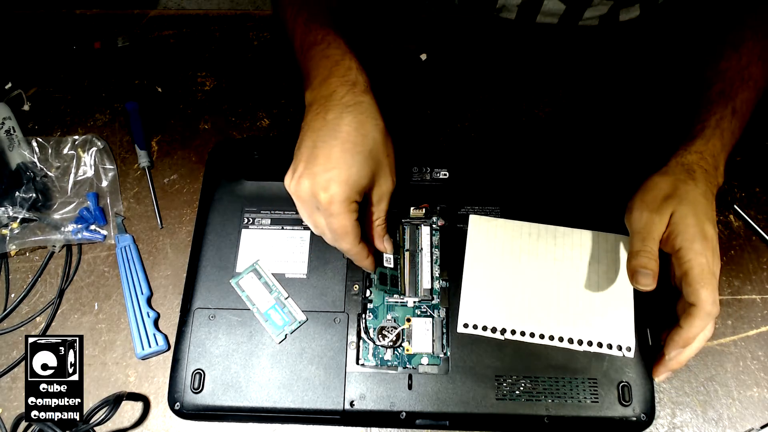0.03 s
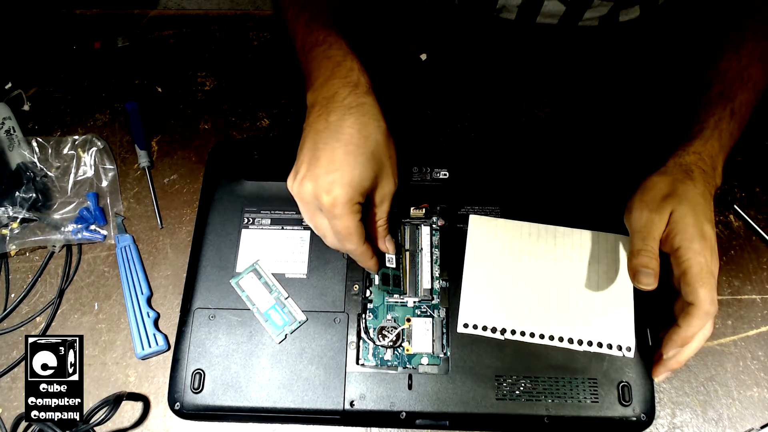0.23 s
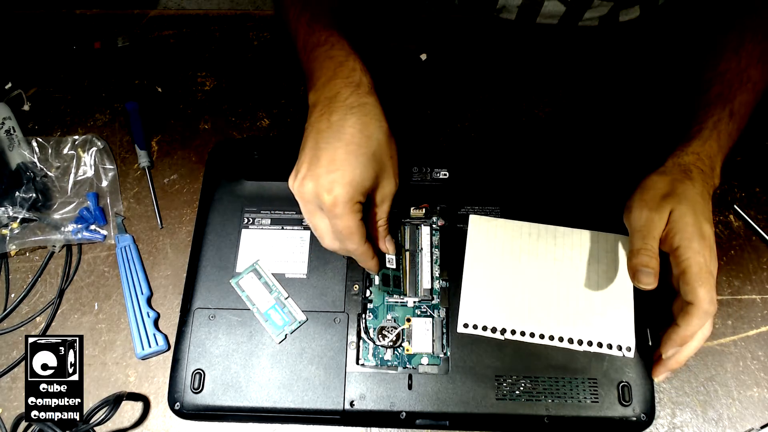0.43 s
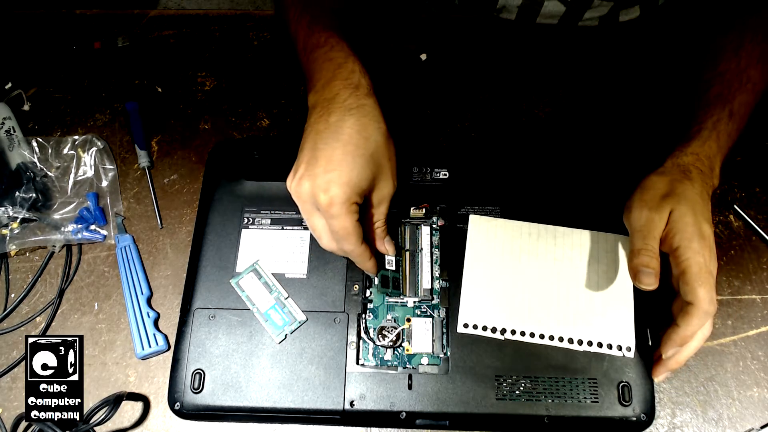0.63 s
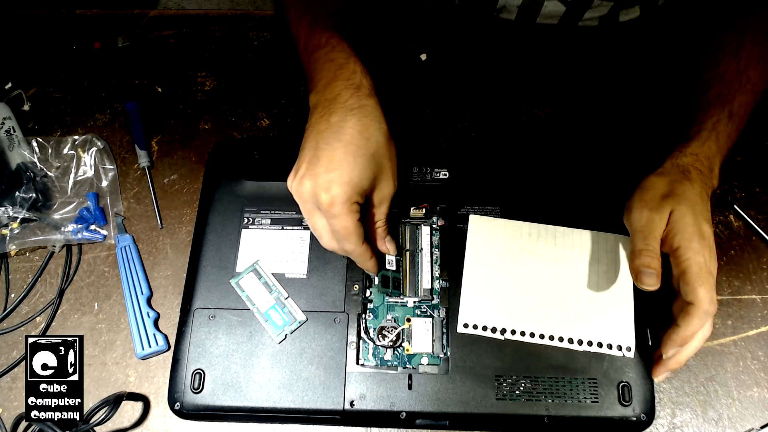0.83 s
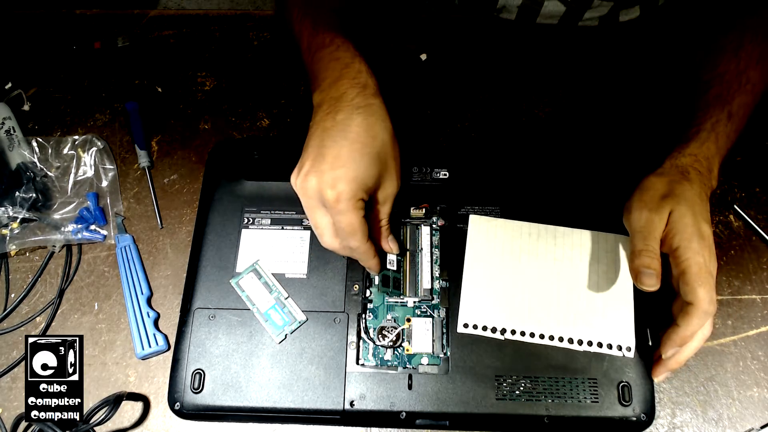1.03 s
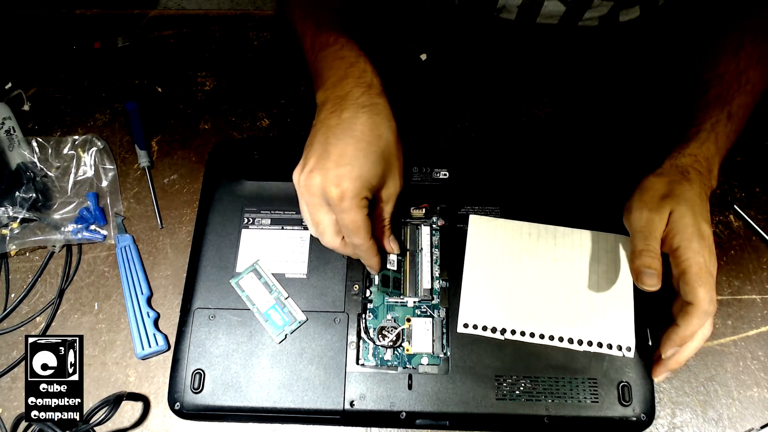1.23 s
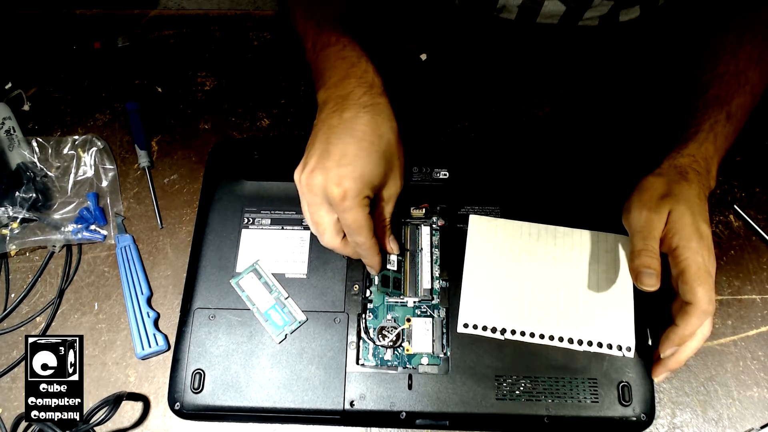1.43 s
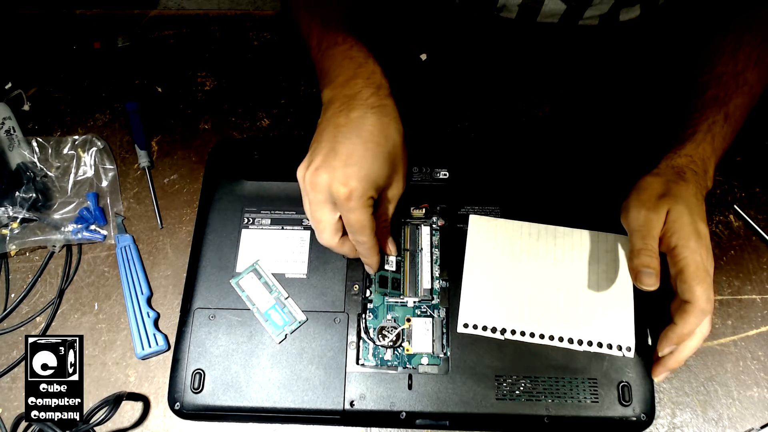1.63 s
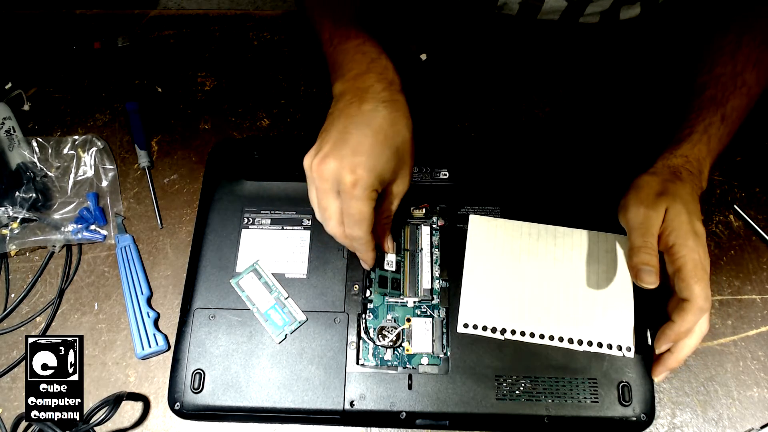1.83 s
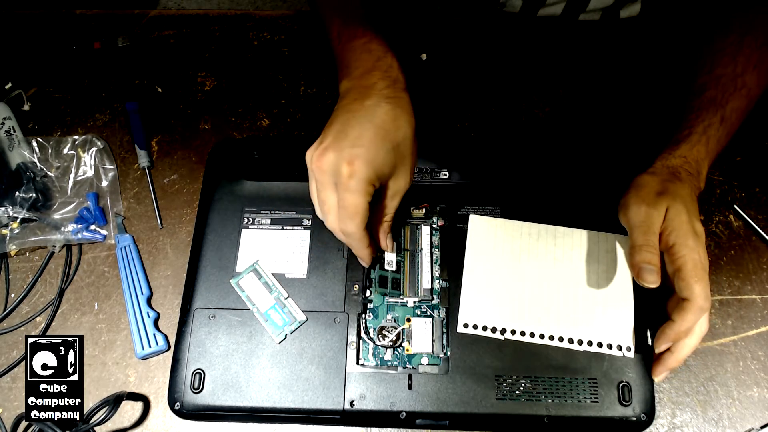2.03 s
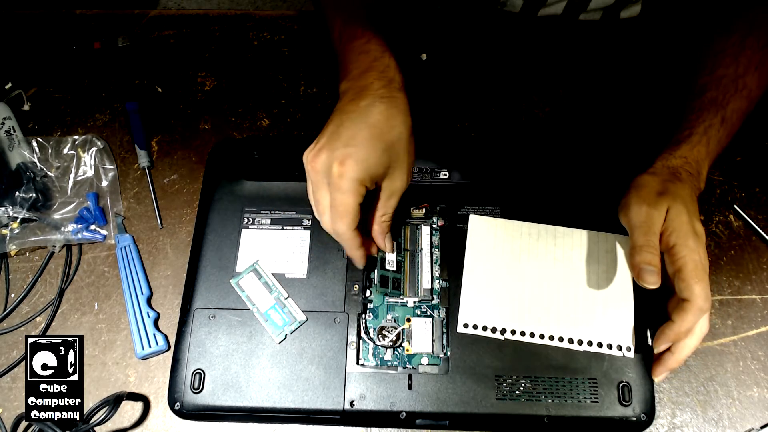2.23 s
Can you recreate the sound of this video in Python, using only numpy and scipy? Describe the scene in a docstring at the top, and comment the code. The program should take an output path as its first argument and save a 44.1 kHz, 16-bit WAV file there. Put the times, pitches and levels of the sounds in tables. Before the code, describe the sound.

Two small plastic clicks and soft finger bumps on a laptop case, with fan air and electrical hum behind.

```python
"""First comes the hum of a small room: mains hum, fan air and a motor drone that swells and sinks.
On the bench, close to the microphones, a memory module is worked into its slot in an upturned laptop.
Its edge scrapes and snaps over the contacts and seats with a knock of the plastic case; a second later
the card gives a duller click. Fingers rub and softly bump the case, and a faint narrow hiss comes twice.
The left microphone is weak, so everything sits mostly on the right."""
import sys
import numpy as np
from scipy import signal
from scipy.fft import rfft, irfft
from scipy.io import wavfile

SR = 44100
rng = np.random.default_rng(int(sys.argv[2]) if len(sys.argv) > 2 else 0)


def wav_out(sig):
    """Save sig, one row per channel (or a flat mono array), as 16-bit PCM at SR to the path in sys.argv[1]."""
    wavfile.write(sys.argv[1], SR, np.round(np.clip(np.atleast_2d(sig).T, -1, 1) * 32767).astype(np.int16))


N = 100592
T = np.arange(N) / SR
BIN_HZ = np.maximum(np.fft.rfftfreq(N, 1 / SR), 1)


def from_db(db):
    """Decibels to gain."""
    return 10 ** (np.asarray(db) / 20)


def unit_power(x):
    """Scale to an rms of 1."""
    return x / np.sqrt(np.mean(x ** 2) + 1e-20)


def spectrum(points):
    """Join (Hz, value) points on a log-frequency axis, giving a value for every bin."""
    freqs, values = np.transpose(points)
    return np.interp(np.log(BIN_HZ), np.log(freqs), values)


def drift(rate_hz):
    """Slow random motion of spread 1."""
    step, settle = 40, 2000
    pole = np.exp(-2 * np.pi * rate_hz * step / SR)
    noise = rng.standard_normal(N // step + settle + 2)
    slow = signal.lfilter([1], [1, -2 * pole, pole * pole], noise)[settle:]
    return np.interp(np.arange(N) / step, np.arange(len(slow)), unit_power(slow))


def swell(centre_s, half_length_s, flatness=2):
    """A bell-shaped rise and fall."""
    return np.exp(-np.abs((T - centre_s) / half_length_s) ** flatness)


def tone(hz, waver_hz, waver_db):
    """A sine of about unit power that wanders a little in pitch and level."""
    phase = 2 * np.pi * (np.cumsum(hz + waver_hz * drift(4.47)) / SR + rng.random())
    return np.sqrt(2) * np.sin(phase) * from_db(waver_db * drift(6.8))


def rough_noise(hz, spread):
    """Noise of quickly flickering strength in a band around hz; unit power."""
    grains = rng.standard_normal(N) * from_db(3 * drift(200))
    edges_hz = [hz / (1 + spread), min(hz * (1 + spread), SR / 3)]
    return unit_power(signal.sosfilt(signal.butter(2, edges_hz, "band", fs=SR, output="sos"), grains))


def blow_force(start_s, db, bright_hz=None):
    """One blow; a softer contact spreads its force over a longer time."""
    force = np.zeros(N)
    force[round(start_s * SR)] = from_db(db)
    pole = np.exp(-2 * np.pi * bright_hz / SR) if bright_hz else 0
    return signal.lfilter([1 - pole], [1, -pole], force + 1e-18)


def struck(blows, modes, vary_db):
    """Every blow rings each mode with its own strength; neighbouring modes swing in opposite directions."""
    forces = np.array([blow_force(*blow) for blow in blows])
    signs = (-1) ** np.arange(len(modes))
    strengths = signs * from_db(vary_db * rng.standard_normal((len(blows), len(modes))))
    out = 0
    for (hz, db, t60), strength in zip(modes, strengths.T):
        decay = np.exp(-np.log(1000) / (t60 * SR))
        angle = 2 * np.pi * hz / SR
        poles = [1, -2 * decay * np.cos(angle), decay * decay]
        out += from_db(db) * signal.lfilter([0, np.sin(angle)], poles, strength @ forces)
    return out


# Fan air filling the room. Each row: frequency in Hz, relative noise density in dB.
AIR_SPECTRUM = [(25, 1), (60, 1), (125, 5), (180, -3), (250, 0.5), (340, -4), (440, -8), (700, -5),
                (1100, -9), (1600, -10), (2500, -19), (4050, -21.5), (4350, -26), (6800, -33)]
# How alike it is at the two microphones. Each row: frequency in Hz, likeness from 0 to 1.
AIR_LIKENESS = [(60, 0.5), (200, 1), (400, 0.9), (750, 0.7), (1400, 0.1), (3000, 0), (6000, 0.1)]


def fan_air(level_db=-34, flutter_db=0.99):
    """Moving air, alike at both microphones in the bass and diffuse in the treble, fluttering slightly."""
    mid, side = rfft(rng.standard_normal((2, N))) * from_db(spectrum(AIR_SPECTRUM))
    alike = np.clip(spectrum(AIR_LIKENESS), 0, 1)
    flow = irfft(np.sqrt(1 + alike) * mid + np.sqrt(1 - alike) * side * [[1], [-1]], N)
    return from_db(level_db + flutter_db * drift(22)) * unit_power(flow)


def motor_drone(hz=44.06, peak_db=-34):
    """A deep motor drone swells once, stays broad at the top and sinks."""
    level = from_db(peak_db) * swell(centre_s=1.06, half_length_s=0.75, flatness=2.6)
    return level * tone(hz, waver_hz=0.081, waver_db=1.4)


# The stronger mains hum, at twice the line frequency. Each row: time in seconds, level in dB.
MAINS_OCTAVE_LEVEL = [(0, -35.5), (.3, -38), (.6, -43), (.9, -43), (1.2, -35.5), (1.55, -35.5),
                      (1.9, -35.5), (2.28, -42)]
# Hum of a fan's blades. Each row: multiple of the blade rate, level in dB.
BLADE_HARMONICS = [(1, -58.5), (2, -46.5), (3, -52.5)]
# Other steady machine tones around the room. Each row: frequency in Hz, level in dB.
MACHINE_WHINES = [(211, -48.5), (254.5, -52.5), (267, -50), (283.5, -57.5), (492, -52), (509, -55.5),
                  (871, -52), (917, -57), (1099, -53), (1394, -60.5), (2944, -64.5), (4110, -60.5)]


def machine_hum(mains_hz=60, mains_db=-47, blade_hz=134.2):
    """Mains, fan blades and other machines hold their tones while the octave of the mains dips and rises."""
    octave_db = np.interp(T, *np.transpose(MAINS_OCTAVE_LEVEL))
    octave = from_db(octave_db) * tone(2 * mains_hz, waver_hz=0.23, waver_db=1.3)
    blades = [(multiple * blade_hz, db) for multiple, db in BLADE_HARMONICS]
    steady = [(mains_hz, mains_db)] + blades + MACHINE_WHINES
    return octave + sum(from_db(db) * tone(hz, waver_hz=0.002493 * hz, waver_db=1.7) for hz, db in steady)


def room_reflections(sound, t60_s=.2, gap_s=.003):
    """Dense reflections from bench and walls, different at each microphone."""
    t = T[:SR // 2]
    tail = rng.standard_normal((2, len(t))) * np.exp(-np.log(1000) * t / t60_s) * (t > gap_s)
    tail /= np.sqrt(np.sum(tail ** 2, axis=1, keepdims=True))
    return signal.fftconvolve(sound[None], tail, axes=1)[:, :N]


# Spells of faint, high hiss. Each row: start in seconds, end in seconds, level in dB.
FAINT_HISSES = [(.2, .44, -51), (1.58, 2.15, -51.5)]


def faint_hiss(hz=3900, attack_s=.086, release_s=.1):
    """A faint narrow hiss that fades in, holds and fades out."""
    level = sum(from_db(db) * np.clip(np.minimum((T - start) / attack_s, (end - T) / release_s), 0, 1)
                for start, end, db in FAINT_HISSES)
    return level * rough_noise(hz, spread=.08)


# Fingertips shifting their grip on the laptop.
# Each row: centre in seconds, level in dB, brightness in Hz, half length in seconds.
GRIP_RUBS = [(.935, -44, 600, .02), (1.105, -35.5, 310, .026), (1.193, -40.5, 800, .022),
             (1.278, -36, 1200, .02), (2.017, -37, 500, .016), (2.23, -35, 620, .012)]


def finger_rubs():
    """Each short dull rub is a stream of tiny slips of uneven size."""
    return sum(from_db(db) * swell(centre, half_length) * rough_noise(hz, spread=0.38)
               for centre, db, hz, half_length in GRIP_RUBS)


# Soft presses that flex the case. Each row: centre in seconds, level in dB, pitch in Hz,
# half length in seconds, fall of pitch in Hz per second.
PRESSES = [(.942, -28.5, 110, .018, 0), (1.10, -35, 190, .015, 0), (2.029, -26.5, 272, .016, 4500),
           (2.246, -16.2, 118, .028, 0)]


def finger_bumps(rumble_db=-14):
    """A press swings the case for a few low cycles, which may sink in pitch as the finger settles."""
    out = 0
    for centre, db, hz, half_length, fall in PRESSES:
        t = T - centre
        swing = np.sin(2 * np.pi * (hz * t - fall * t ** 2 / 2))
        skin_drag = from_db(rumble_db) * rough_noise(hz, spread=.9)
        out += from_db(db) * swell(centre, half_length, flatness=3.2) * (swing + skin_drag)
    return out


# Knocks on the case, close by on the bench. Each row: start in seconds, force in dB,
# contact brightness in Hz, share of the ring time that the resting fingers leave.
CASE_KNOCKS = [(.2294, -16, 1400, .22), (.6545, -35, 2500, .5), (.6658, -18, 3300, 1),
               (.6719, -28, 1000, 1), (.9195, -33, 3500, .4), (.927, -24, 800, .35), (1.118, -28, 900, .6),
               (1.197, -26.5, 1100, .4)]
# Modes of the free shell. Each row: frequency in Hz, gain in dB, seconds to fade by 60 dB.
CASE_MODES = [(496, -3.5, .14), (655, -4.5, .045), (790, -10, .025), (950, -7, .026), (1080, -8, .03),
              (1490, -11, .025), (1650, -11, .03)]


def case_knocks(grip_rise=.26, low_cut_hz=380):
    """Knocks ring the plastic shell; resting fingers stiffen it, raise its pitch and cut the ring short."""
    rings = 0
    for start, db, bright_hz, ring_share in CASE_KNOCKS:
        pitch_ratio = 1 + grip_rise * (1 - ring_share)
        held_modes = [(hz * pitch_ratio, mode_db, t60 * ring_share) for hz, mode_db, t60 in CASE_MODES]
        rings += struck([(start, db, bright_hz)], held_modes, vary_db=1)
    # So small a shell radiates little bass.
    return signal.sosfilt(signal.butter(2, low_cut_hz, "high", fs=SR, output="sos"), rings)


# The card clicking against its seat. Each row: start in seconds, force in dB, contact brightness in Hz.
CARD_CLICKS = [(.673, -32, 2000), (1.182, -32, 1500), (1.193, -35, 2400), (1.2665, -28, 2400),
               (1.6807, -15.4, 1800)]
# The touches within a click. Each row: delay in seconds, relative force in dB, brightness as a multiple.
CLICK_RATTLE = [(0, 0, 1), (.0049, -9, 3.5), (.0208, -11.5, 1.3)]
# Modes of the card. Each row: frequency in Hz, gain in dB, seconds to fade by 60 dB.
CARD_MODES = [(800, -17, .025), (915, -7, .035), (1070, -1.5, .04), (1295, -8, .026), (1440, -12, .03),
              (1720, -14, .025), (2000, -12.5, .03)]


def card_clicks():
    """The card strikes its seat and rings dully; each click ends in a short rattle."""
    blows = [(start + delay, db + touch_db, hz * brighter)
             for start, db, hz in CARD_CLICKS for delay, touch_db, brighter in CLICK_RATTLE]
    return struck(blows, CARD_MODES, vary_db=1)


# The card edge scraping in the slot. Each row: centre in seconds, level in dB, half length in seconds,
# brightness in Hz, relative bandwidth.
EDGE_SCRAPES = [(.657, -33.5, .009, 3400, .5), (.908, -52, .04, 5080, .03), (.922, -43, .005, 2900, .8),
                (1.269, -40.5, .009, 2000, .6)]
# The edge snapping over a contact. Each row: start in seconds, force in dB, favoured pitch in Hz,
# relative force of the rebound in dB.
EDGE_SNAPS = [(.6535, -22.5, 5200, 0), (.6648, -18.3, 3800, -8), (.6735, -30, 3300, -6),
              (.9185, -27.5, 7000, -8), (1.196, -33, 2600, -8), (1.332, -37, 2100, -4)]
# Modes of the slot. Each row: frequency in Hz, gain in dB, seconds to fade by 60 dB.
SLOT_MODES = [(1650, -7, .02), (1930, -5.5, .025), (2450, -4.5, .022), (2930, -7, .016), (3360, -5, .018),
              (3630, -4, .023), (4150, -7.5, .012), (4700, -6, .009), (5100, -12, .018), (6200, -12, .007)]


def edge_in_slot(rebound_s=.0043, octave_loss_db=4):
    """The edge scrapes and snaps over the contacts; a snap rebounds once and favours modes near its pitch."""
    out = sum(from_db(db) * swell(centre, half_length) * rough_noise(hz, spread)
              for centre, db, half_length, hz, spread in EDGE_SCRAPES)
    for start, db, pitch, rebound_db in EDGE_SNAPS:
        modes = [(hz, mode_db - octave_loss_db * np.log2(hz / pitch) ** 2, t60)
                 for hz, mode_db, t60 in SLOT_MODES]
        out += struck([(start, db), (start + rebound_s, db + rebound_db)], modes, vary_db=1.5)
    return out


def scene(reflections_db=-11.5):
    """Close handling on the bench and a faint hiss, with the room's reflections, hum and air behind."""
    direct = edge_in_slot() + case_knocks() + card_clicks() + finger_rubs() + faint_hiss()
    reflections = from_db(reflections_db) * room_reflections(direct)
    return direct + reflections + finger_bumps() + motor_drone() + machine_hum() + fan_air()


# Sensitivity of the left microphone. Each row: frequency in Hz, gain in dB relative to the right one.
LEFT_SENSITIVITY = [(100, -13), (500, -11), (3000, -10)]
LEFT_LEAD_S, HISS_DB, CUTOFF_HZ = 0.0001, -52, 6950


def record(dry):
    """The left microphone is weak and hears a little earlier; both hiss faintly, and the top is cut."""
    early = np.interp(T + LEFT_LEAD_S, T, dry[0])
    left = irfft(rfft(early) * from_db(spectrum(LEFT_SENSITIVITY)), N)
    pair = np.array([left, dry[1]]) + from_db(HISS_DB) * rng.standard_normal((2, N))
    return signal.sosfilt(signal.ellip(12, .2, 80, CUTOFF_HZ, fs=SR, output="sos"), pair)


dry = scene()
out = record(dry)
wav_out(out)
```